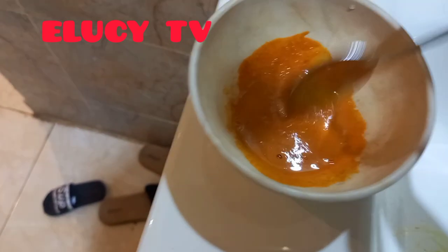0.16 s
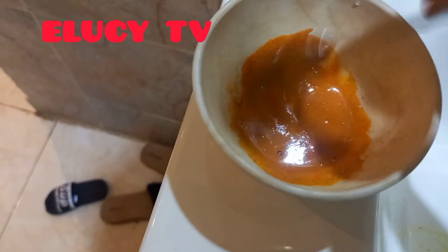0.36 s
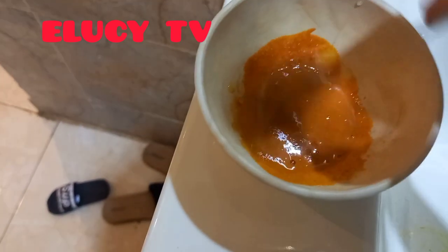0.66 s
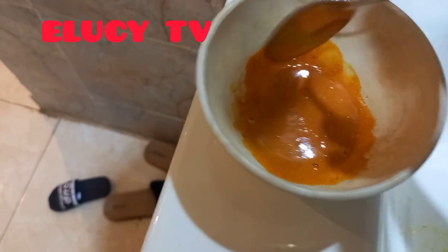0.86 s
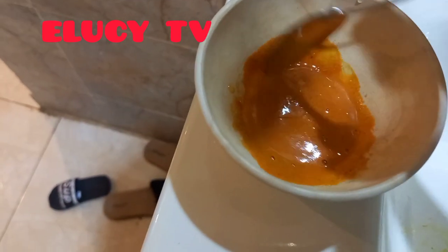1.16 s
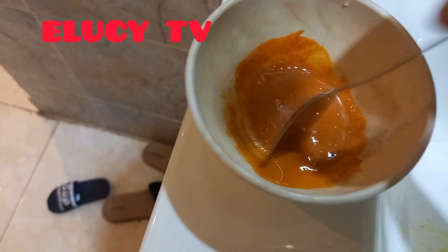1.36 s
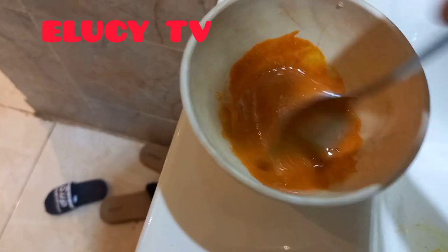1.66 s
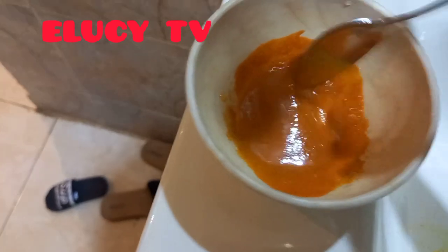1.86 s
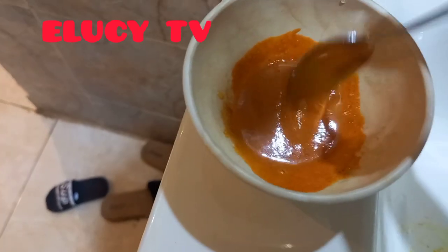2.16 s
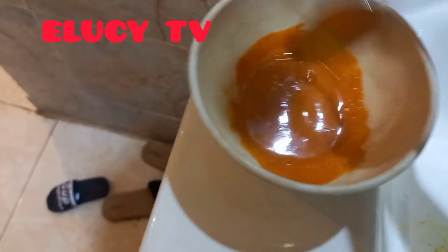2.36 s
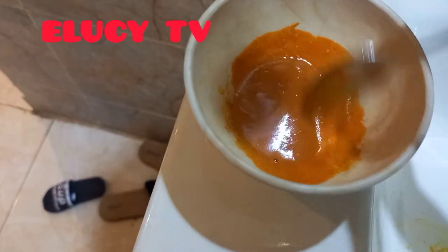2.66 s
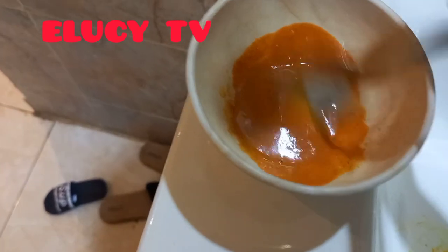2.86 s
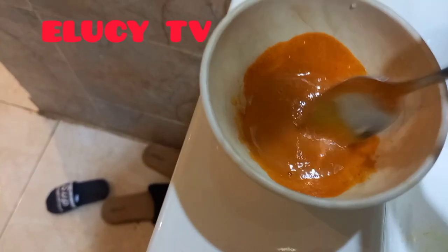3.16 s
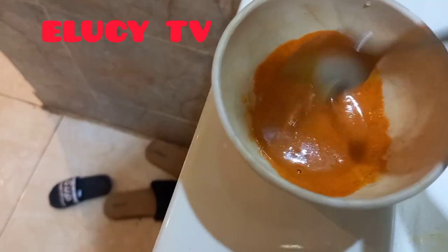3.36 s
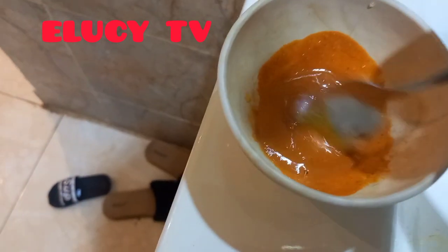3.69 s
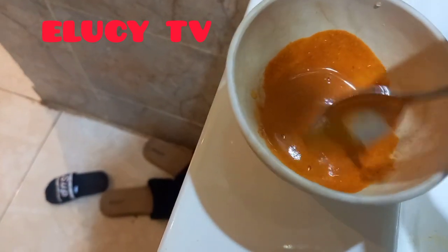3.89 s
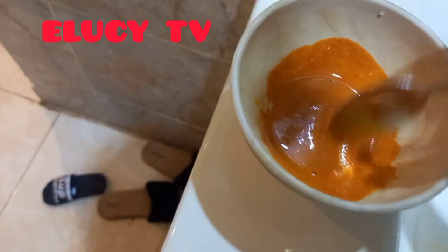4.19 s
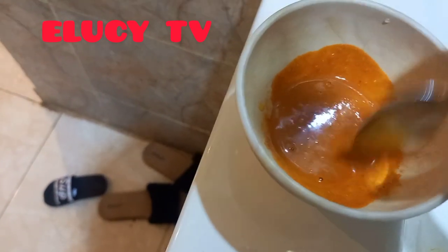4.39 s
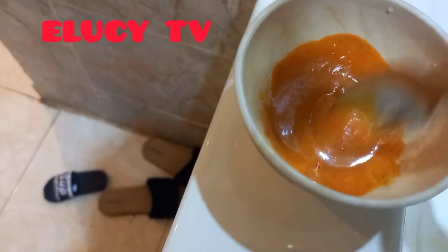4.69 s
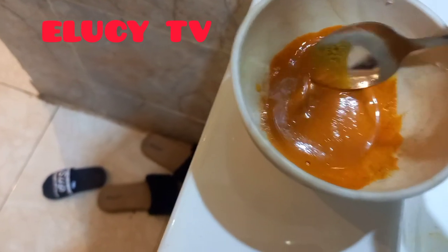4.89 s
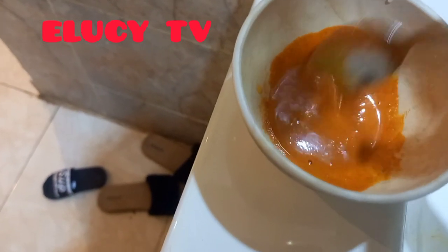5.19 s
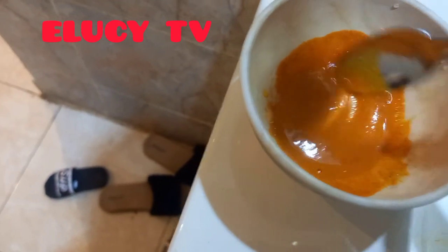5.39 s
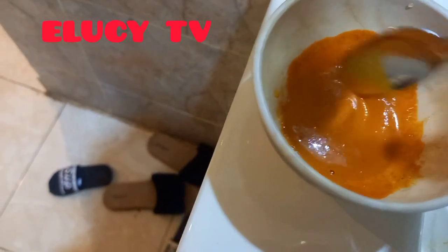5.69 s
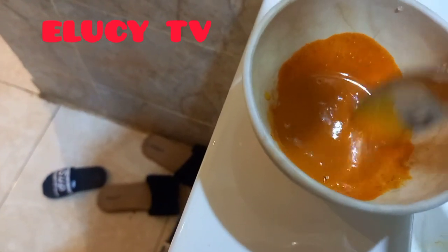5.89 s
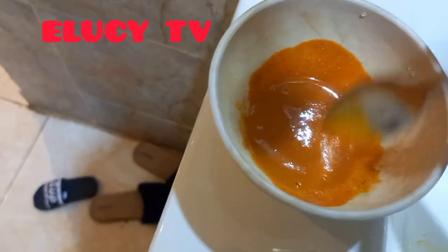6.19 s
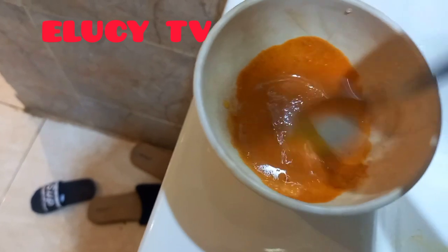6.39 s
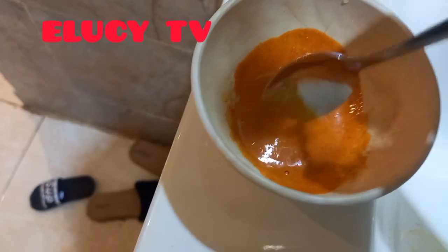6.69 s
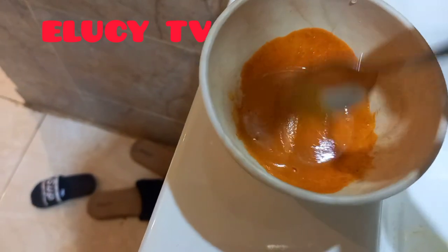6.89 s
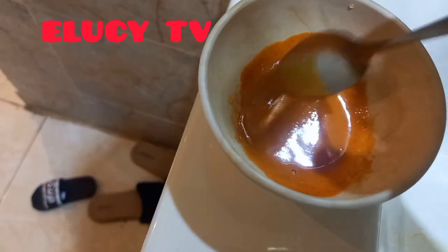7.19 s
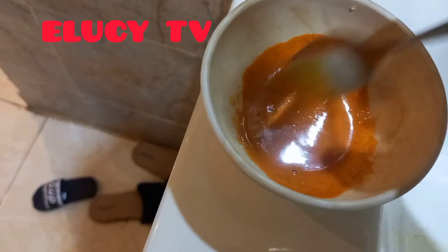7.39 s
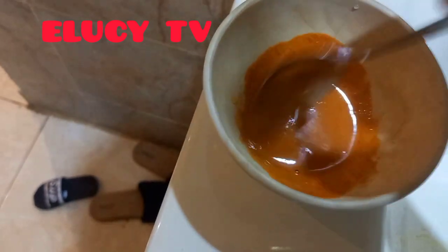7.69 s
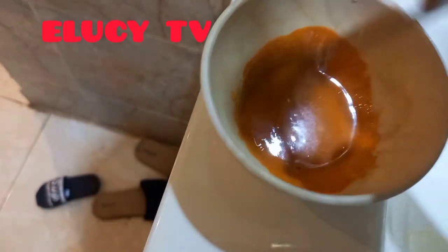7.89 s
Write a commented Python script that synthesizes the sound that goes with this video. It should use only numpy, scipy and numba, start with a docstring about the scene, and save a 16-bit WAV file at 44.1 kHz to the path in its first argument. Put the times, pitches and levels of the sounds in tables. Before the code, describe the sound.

Very close to a handheld microphone, a steel spoon rubs grainy paste around a bowl in short, irregular strokes, clacking against the wall. Scrapes start soft, strengthen after two seconds, become fast and loudest around five, then turn sparse after seven. Tiny wet ticks and occasional thin, high pings sit over faint hiss and hum, with a short tiled-room tail.

```python
"""A steel spoon stirs a gritty paste in a bowl, close to a hand-held phone in a small tiled bathroom.
Throughout, a fan hums and the room hisses: filtered noise and a wavering sine. From the start grit rubs
the bowl stroke by stroke and the spoon knocks its wall, noise driving the wall modes, while the paste pops.
The spoon first rings thinly at 0.4 s, as decaying sines; the bowl first jolts at 1.7 s, a short low swing.
Strokes grow louder from 2 s, are loudest near 5 s and turn sparse after 7.2 s."""
import sys
import numpy as np
from scipy import signal
from scipy.fft import rfft, irfft
from scipy.io import wavfile
from scipy.ndimage import uniform_filter1d
from numba import njit

SR = 44100
rng = np.random.default_rng(int(sys.argv[2]) if len(sys.argv) > 2 else 0)


def wav_record(signal):
    """Record a signal, one row per channel, as 16-bit PCM in the file named by sys.argv[1]."""
    frames = np.transpose(np.atleast_2d(signal))
    bounded = np.clip(frames, -1, 1)
    # unit amplitude maps onto the largest positive 16-bit level
    quanta = np.round(bounded * 32767).astype(np.int16)
    wavfile.write(sys.argv[1], SR, quanta)


N = 355005

# sweeps of the spoon along the wall; levels before the layer gains, rise and fall those of the scrape:
# hardest_pressure_s, scrape_db, rise_s, fall_s, low_body_rel_db, fine_grit_rel_db
STROKES = [(.068, -43.5, .012, 0.086, 11.5, -14), (.115, -32, 0.084, .07, -1, -6),
           (0.261, -45, 0.026, .17, 10, -2), (.36, -37, 0.092, 0.11, -2.5, -1),
           (.59, -49.5, .015, 0.11, 11, -8), (.65, -39.5, 0.084, 0.13, 3.5, -1),
           (.7, -47.5, 0.15, 0.14, 3, 3), (0.873, -42, 0.025, 0.049, 12, -10),
           (0.963, -40, 0.12, 0.18, 4, 4.5), (1.285, -44.5, 0.016, .13, 12, 4),
           (1.35, -43, 0.12, 0.11, 0, -1), (1.68, -47, 0.15, 0.068, 5.5, 0),
           (1.781, -36, 0.15, 0.17, 0, -5), (1.85, -43, .1, 0.13, -11, 1),
           (2.02, -45.5, 0.29, 0.031, -14, 0.5), (2.051, -39.5, 0.018, .1, 11.5, -1),
           (2.136, -27, 0.096, 0.095, -3.5, -11), (2.33, -45, .18, 0.43, 2, 1),
           (2.421, -45, 0.092, 0.11, 4.5, 4), (2.57, -41, 0.033, 0.35, 2.5, 0),
           (2.671, -37, .15, 0.033, 6.5, -16), (2.721, -35.5, 0.13, 0.12, -4.5, -1),
           (2.874, -25.5, 0.08, 0.091, -3.5, -10), (2.96, -44, 0.13, 0.46, 1.5, -8),
           (3.123, -27.5, 0.096, 0.098, -5.5, -10), (3.2, -50, 0.044, 0.27, 1.5, -2),
           (3.421, -26, 0.14, 0.094, -1.5, -6), (3.53, -39, 0.35, 0.2, -9, -6),
           (3.678, -26.5, 0.11, 0.11, -3.5, -11), (3.951, -28.5, 0.062, 0.11, 0.5, -14),
           (4.18, -41, 0.12, 0.2, 7, 1), (4.383, -28.5, 0.017, 0.068, 5, -4),
           (4.428, -43.5, 0.071, 0.16, 8.5, 6), (4.57, -29.5, 0.16, 0.12, -3.5, -5.5),
           (4.609, -37, 0.12, 0.069, -15, -25), (4.739, -28.5, 0.059, 0.075, -2, -7),
           (4.82, -31.5, 0.067, .05, -1.5, -7), (4.851, -21.5, 0.092, 0.066, -7, -11),
           (4.983, -29.5, 0.088, 0.05, -4, -14), (5.089, -28, 0.11, .08, -4, -12),
           (5.17, -46, 0.13, .08, 7.5, -13), (5.237, -19, 0.091, 0.083, -4.5, -12),
           (5.35, -31, 0.17, 0.13, -6, -14), (5.491, -25.5, 0.12, .14, -4, -12),
           (5.63, -32.5, .19, .12, -5, -4), (5.791, -24.5, .13, 0.087, -4.5, -11),
           (5.92, -32.5, .15, 0.19, -8, -4), (6.098, -25, 0.14, 0.092, -3, -13),
           (6.22, -32.5, .13, 0.13, -1, -2.5), (6.361, -26, 0.053, 0.16, 0.5, -12.5),
           (6.398, -25, 0.14, 0.044, -6, -15), (6.51, -29, 0.13, 0.18, -2, -5),
           (6.628, -29, 0.079, 0.064, -3.5, -11), (6.861, -44.5, 0.062, 0.11, 13, -6),
           (6.909, -23.5, 0.076, 0.058, -4, -37), (6.95, -56.5, .05, 0.13, 9.5, -10),
           (7.12, -58, 0.066, 0.056, -7, -3), (7.164, -28, 0.096, 0.099, -3.5, -10.5),
           (7.382, -34.5, 0.09, 0.054, -2, -8.5), (7.89, -40.5, 0.029, 0.19, -1.5, 3.5),
           (8.05, -50.5, 0.12, .1, 2, 12)]
# spectrum of fine grit, contact snap and ring tick: freq_hz, relative_level_db_per_hz
SNAP_SPECTRUM = [(600, -70.5), (6000, -0.5), (8300, 0), (9900, -10), (12000, -5), (13300, -12),
                 (14500, -10), (16000, -4)]


def undb(db):
    """dB to gain."""
    return 10 ** (np.asarray(db) / 20)


def unit(x):
    """Scale to rms 1."""
    return x / np.sqrt(np.mean(x ** 2))


def along(table, hz):
    """Read (Hz, value) rows on a log frequency axis."""
    table_hz, values = np.transpose(table)
    return np.interp(np.log(hz + 1), np.log(table_hz), values)


def colour(x, gain_at, size=2048):
    """Causal filter with the given gain law at unit power, from the folded cepstrum."""
    gain = gain_at(np.fft.rfftfreq(size, 1 / SR))
    cepstrum = irfft(np.log(gain / np.sqrt(np.mean(gain ** 2))))
    cepstrum[1:size // 2] *= 2
    cepstrum[size // 2 + 1:] = 0
    impulse = irfft(np.exp(rfft(cepstrum)))
    return signal.oaconvolve(x, impulse[None], axes=1)[:, :N]


@njit
def svf(x, hz, width_hz):
    """Two state-variable band-passes in a row, each of this width, moving centre, gain 1 there."""
    y = np.empty(x.shape)
    for c in range(2):
        b = l = b2 = l2 = g = k = h = 0.
        for i in range(x.shape[1]):
            if i % 32 == 0:
                g, k = np.tan(np.pi * hz[i] / SR), width_hz / hz[i]
                h = 1 / (1 + g * (g + k))
            v = (b + g * (x[c, i] - l)) * h
            b, l = 2 * v - b, l + 2 * g * v
            w = (b2 + g * (k * v - l2)) * h
            b2, l2, y[c, i] = 2 * w - b2, l2 + 2 * g * w, k * w
    return y


def walk(rate_hz, step=32):
    """Random levels held about 1 / rate_hz and slewed twice; spread near 1."""
    hold = max(int(SR / step / rate_hz), 2)
    levels = np.repeat(rng.standard_normal(N // step // hold + 2), hold)
    slow = 1.3 * uniform_filter1d(uniform_filter1d(levels, hold), hold)
    return np.interp(np.arange(N) / step, np.arange(len(slow)), slow)


def pair():
    """Noise for the phone's two ports, alike in part of the spectrum and independent elsewhere."""
    # likeness of the ports: freq_hz, likeness_0_to_1
    likeness = [(60, 0.03), (300, 0.88), (1000, 0.66), (2200, 0.52), (4000, 0), (8500, 0), (12000, 0.39)]
    left, other = rfft(rng.standard_normal((2, N)))
    alike = np.clip(along(likeness, np.fft.rfftfreq(N, 1 / SR)), 0, 1)
    return irfft([left, alike * left + np.sqrt(1 - alike ** 2) * other], N)


def bursts(at_s, db, rise_s, fall_s):
    """Envelope of short contacts: quick rise, exponential fall."""
    marks = np.zeros(N)
    index = np.clip((np.asarray(at_s) * SR).astype(int), 0, N - 1)
    np.add.at(marks, index, undb(db))
    t = np.arange(int(12 * fall_s * SR)) / SR
    shape = (1 - np.exp(-t / rise_s)) * np.exp(-t / fall_s)
    return np.abs(signal.oaconvolve(marks, shape / shape.max())[:N])


def room():
    """Faint shaped hiss, a resonant whirr band and a wavering mains hum."""
    # hiss spectrum: freq_hz, relative_level_db_per_hz
    hiss_spectrum = [(25, -24), (70, 0), (200, -9), (520, -18.5), (900, -12), (1300, -11), (1750, -14),
                     (2200, -4.5), (3700, 2), (5200, -1), (7200, -10), (8200, -38), (10500, -9),
                     (16000, -11)]
    hiss_db, whirr_db, hum_db = -44.5, -51.5, -66  # rms, each wandering about this level
    whirr_hz, whirr_width_hz, hum_hz = 1310, 226, 119.8
    hiss = unit(colour(pair(), lambda hz: undb(along(hiss_spectrum, hz)), size=8192))
    hiss = hiss * undb(hiss_db + 2.7 * walk(6))
    whirr = colour(pair(), lambda hz: 1 / (1 + (2 * (hz - whirr_hz) / whirr_width_hz) ** 2) + 1e-4)
    whirr = whirr * undb(whirr_db + 2.0 * walk(6.1))
    phase = 2 * np.pi * hum_hz * np.arange(N) / SR + 0.45 * walk(3.02)
    hum = np.sqrt(2) * np.sin(phase) * undb(hum_db + 1.8 * walk(10.0))
    return hiss + whirr + hum


def sweeps(db, drag_db, rise_stretch=1, fall_stretch=1):
    """Pressure of all strokes over the light drag through the paste, summed in power."""
    rise_power, fall_power = 2.72, 2.67  # of amplitude, on a straight ramp
    t, power = np.arange(0, N, 32) / SR, undb(2 * drag_db)
    for (s, _, rise_s, fall_s, *_), peak_db in zip(STROKES, db):
        ramp = np.interp(t, [s - rise_s * rise_stretch, s, s + fall_s * fall_stretch], [0, 1, 0])
        power = power + undb(2 * peak_db) * ramp ** (2 * np.where(t < s, rise_power, fall_power))
    return np.interp(np.arange(N) / SR, t, np.sqrt(power))


def grit(rate_hz, spread_db, smooth, judder_db):
    """Envelope of grains crushed under the edge over a smooth slide; the pressure judders."""
    count = int(rate_hz * N / SR)
    at_s = rng.random(count) * N / SR
    grain_db = spread_db * np.clip(rng.standard_normal(count), -2, 2)
    grains = bursts(at_s, grain_db, 0.0001, 0.0018)
    return unit((smooth + unit(grains)) * undb(judder_db * walk(70)))


def bowl(low, body, clack, hollow_hz):
    """The rubbing point wanders, so each wall mode swells, fades and bends alone; paste loads the low ones apart."""
    # mean pitch of each wall mode: pitch_hz
    wall_hz = [395, 755, 1020, 1180, 2060, 2420, 3380, 3680, 4400, 5070, 5750, 6160, 6780, 8000]
    # same modes: filter_width_hz, level_db
    wall_modes = [(40.8, -9.5), (129, -4), (165, -2), (210, -1.5), (180, -2), (196, -3.5), (208, 2.5),
                  (218, 4), (298, -26), (275, -4.5), (262, 0), (161, -8.5), (300, -5.5), (690, -5.5)]
    # broad rubbing sound between the modes: freq_hz, level_db
    between_modes = [(350, -39), (500, -22.5), (700, -31), (1400, -0.5), (2900, 2), (5700, -13.5)]
    low_below_hz = 1700
    out = 0
    for hz, (width_hz, db) in zip(wall_hz, wall_modes):
        rub = low if hz < low_below_hz else body
        swell_db = (2.4 if hz < 900 else 3.6) * walk(16)
        drive = rub * undb(swell_db) + clack
        out = out + undb(db) * svf(drive, hz * (1 + 0.033 * walk(15)), 1. * width_hz)
    for hz in 350 * 2 ** np.arange(0, 4.3, .5):  # half-octave bands
        rub = low if hz < low_below_hz else body
        drive = rub * undb(along(between_modes, hz) + 3. * walk(90))
        out = out + svf(drive, np.full(N, hz), hz / 2)
    hollow = undb(-4.5) * svf(body, hollow_hz, 520.0)
    return out + hollow + undb(2.0) * clack


def stirring():
    """Scrape and knocks drive the same bowl; the finest grit and the snap of contact are heard directly."""
    # spoon meets the wall, levels before the contact gains: start_s, level_db, clack_centre_hz, snap_rel_db
    knocks = [(0.009, -28.5, 1210, 2), (0.061, -21.5, 1310, -23), (0.117, -18, 3360, -21),
              (0.25, -23.5, 1130, -6.5), (0.296, -41, 1020, -14), (0.39, -28, 3730, -7.5),
              (0.593, -35.5, 1080, -15), (0.685, -18, 3900, -5), (0.863, -24.5, 1170, -2),
              (0.949, -27, 1200, -29), (0.996, -27.5, 1240, -1), (1.28, -28, 1480, -12),
              (1.328, -33, 1160, 3.5), (1.574, -24.5, 1780, -14), (1.612, -32, 5550, -7.5),
              (1.66, -16, 5530, -2.5), (1.765, -29, 1160, -28), (1.842, -17, 5200, -7),
              (2.045, -19, 1130, -11), (2.28, -11, 3020, -10), (2.407, -16, 1570, -41),
              (2.531, -32, 4820, -8), (2.572, -25, 2640, 2.5), (2.629, -21.5, 1490, -21),
              (2.699, -23, 4500, -17), (2.712, -19.5, 5200, -9.5), (2.815, -14.5, 1440, -40),
              (2.851, -18, 3000, -24), (2.968, -28.5, 2960, -18), (3.013, -16.5, 4470, -11.5),
              (3.208, -31, 3000, -14), (3.316, -25, 6000, -11), (3.527, -22.5, 2520, -16),
              (3.906, -7.5, 2280, -53), (4.126, -20, 2900, 3.5), (4.214, -22, 1310, -19),
              (4.293, -30.5, 5240, -12), (4.372, -11, 2800, -7.5), (4.448, -15.5, 1480, -40),
              (4.606, -14.5, 5400, -21), (4.715, -21, 3680, -18), (4.994, -22, 1190, -23),
              (5.108, -14.5, 5050, -22), (5.359, -33, 2200, 3), (5.654, -41, 2090, 3),
              (6.193, -23, 3570, -19), (6.815, -15.5, 1730, -3), (7.095, -23.5, 1610, -5),
              (7.324, -11.5, 1390, -22), (7.588, -34.5, 4540, -4.5), (7.777, -34, 4500, -13),
              (8.036, -30.5, 980, -11)]
    _, db, _, _, low_db, fine_db = np.transpose(STROKES)
    at_s, hit_db, clack_hz, snap_db = np.transpose(knocks)
    t, pressure = np.arange(N) / SR, sweeps(db, -60.5)

    # the hollow under the spoon drops in pitch as pressure passes a level
    hollow_top_hz, hollow_from_db, hollow_hz_per_db = 4820, -46, -57
    over_db = np.maximum(20 * np.log10(pressure) - hollow_from_db, 0)
    hollow_hz = (hollow_top_hz + hollow_hz_per_db * over_db) * (1 + .06 * walk(12))

    noise = pair()
    coarse = grit(420., 3.2, smooth=1.1, judder_db=1.3)
    low = coarse * undb(18.0) * sweeps(db + low_db, -66, 1.24, 1.12) * noise
    body = coarse * undb(15.0) * pressure * noise

    # contact chatters for some milliseconds, then the paste smears; the spot struck sets the colour
    chatter = bursts(at_s, hit_db + 11.5, 0.000053, 0.0028)
    smear = bursts(at_s, hit_db - 4.5, 0.004, 0.0089)
    spot_hz = clack_hz[np.clip(np.searchsorted(at_s, t) - 1, 0, None)]
    clack = svf((chatter + smear) * np.tanh(2 * noise), spot_hz, 3280.0)
    # a light spoon moves little bass
    clack = signal.sosfilt(signal.butter(4, 900, "high", fs=SR, output="sos"), clack)

    sand = grit(200., 5.0, smooth=1.1, judder_db=2.5)
    fine = sand * undb(5.5) * sweeps(db + fine_db, -57.5, 1.06, 1.04)
    snap = bursts(at_s, hit_db + snap_db + 8.0, 0.00011, 0.0045)
    direct = colour((fine + snap) * noise, lambda hz: undb(along(SNAP_SPECTRUM, hz)))
    return bowl(low, body, clack, hollow_hz) + direct


def pops(rate_hz=37.0, db=-20.0):
    """Tiny air pockets in the paste burst at random, heard through a wandering band near 5.4 kHz."""
    count = int(rate_hz * N / SR)
    at_s = rng.random(count) * N / SR
    pop_db = db + 2.2 * np.clip(rng.standard_normal(count), -2, 2)
    ticks = bursts(at_s, pop_db, .0001, 0.00087)
    return svf(ticks * pair(), 5380.0 * (1 + 0.06 * walk(40)), 1750.0)


def steel():
    """Each ping ticks and sets off the high modes of the spoon in its own mix."""
    # steel rings free, nominal levels of the 12 kHz mode:
    # start_s, level_db, modes_below_11khz_rel_db, modes_above_13khz_rel_db
    pings = [(0.4419, -41.5, -3, -13), (0.7357, -26.5, -12, 2), (0.9088, -42, -3, -9),
             (1.0595, -40, -5, -7), (1.3698, -29.5, -4, -2), (2.415, -32, -4, -5), (2.5523, -28.5, -4, -15),
             (3.849, -41, -12, 11), (5.44, -36, -14, -9), (5.8563, -21.5, 1, 1), (6.124, -35, -16, 0),
             (6.718, -28.5, -7.5, 1), (6.997, -46, -10, -7), (7.1472, -54, -8, -6), (7.476, -27, -28, -11)]
    # spoon modes: pitch_hz, relative_level_db, t60_s
    spoon_modes = [(8980, -5, .08), (9240, -2, .06), (9560, -3, .08), (10300, -9, .07), (12045, 0, .09),
                   (14230, -3, .08), (14370, -3, .08)]
    out, t = np.zeros((2, N + SR)), np.arange(SR // 4) / SR
    hz, db, t60_s = np.transpose(spoon_modes)[:, :, None]
    chance = rng.standard_normal((len(pings), 2, 2, len(spoon_modes), 1))
    port_db = np.array([[-2.5], [2.5]])
    for (s, peak_db, lower_db, upper_db), (mix, turn) in zip(pings, chance):
        mode_db = db + lower_db * (hz < 11000) + upper_db * (hz > 13000) + 1.5 * mix
        ring = undb(mode_db - 60 * t / t60_s) * np.sin(2 * np.pi * (hz * t + turn))
        onset = 1 - np.exp(-t / 0.00052)
        i = int(s * SR)
        out[:, i:i + len(t)] += undb(peak_db + port_db) * ring.sum(1) * onset
    at_s, peak_db = np.transpose(pings)[:2]
    tick = bursts(at_s, peak_db + 0.5, 0.00014, 0.00089) * pair()
    # the grip on the handle makes the ring flutter
    ringing = out[:, :N] * undb(2.7 * walk(150))
    return ringing + colour(tick, lambda hz: undb(along(SNAP_SPECTRUM, hz)))


def thuds():
    """The bowl jolts in the hand: one soft, fast-dying 73 Hz swing for each jolt."""
    # jolts, levels before the swing and port gains: start_s, level_db
    jolts = [(1.652, -51), (3.906, -61), (4.126, -40), (4.37, -55), (6.814, -50)]
    at_s, db = np.transpose(jolts)
    t = np.arange(SR // 5) / SR
    marks = np.zeros(N)
    marks[(at_s * SR).astype(int)] = undb(db)
    swing = np.sin(2 * np.pi * 73.0 * t) * np.exp(-t / 0.014) * 3.2
    return signal.oaconvolve(marks, swing)[:N] * np.array([[1.4], [.2]])  # left, right gain


def tiles(near):
    """Short tail of the tiles: decaying noise starting after 4 ms."""
    t60_s, tail_db = 0.22, -18.5
    t = np.arange(SR // 2) / SR
    tail = rng.standard_normal((2, len(t))) * undb(-60 * t / t60_s) * (t > .004)
    tail = tail / np.sqrt(np.sum(tail ** 2, axis=1, keepdims=True))
    return undb(tail_db) * signal.oaconvolve(near, tail, axes=1)[:, :N]


def scene():
    """Near sounds with their tiled tail, over the jolts and the room tone."""
    near = stirring() + pops() + steel()
    return room() + near + tiles(near) + thuds()


def record(dry):
    """The right port is shaded in the upper middle; the loudest peaks round off; the top is cut."""
    # right port response: freq_hz, gain_db
    right_port = [(30, -10), (60, -3), (120, 2), (350, 0), (800, 0), (1200, -5), (2200, -3), (2500, -12),
                  (3700, -17), (6200, -16), (7300, -8), (7900, 0), (9900, 6), (10600, 0), (15000, -3)]
    top_hz = 15750
    port_gain = lambda hz: undb(along(right_port, hz))
    # colour() scales to unit power; restore the port's own gain
    port_rms = np.sqrt(np.mean(port_gain(np.fft.rfftfreq(2048, 1 / SR)) ** 2))
    right = colour(dry[1:], port_gain) * port_rms
    rounded = np.tanh(np.vstack([dry[:1], right]))
    return signal.sosfilt(signal.ellip(10, .2, 60, top_hz, fs=SR, output="sos"), rounded)


dry = scene()
out = record(dry)
wav_record(out)
```